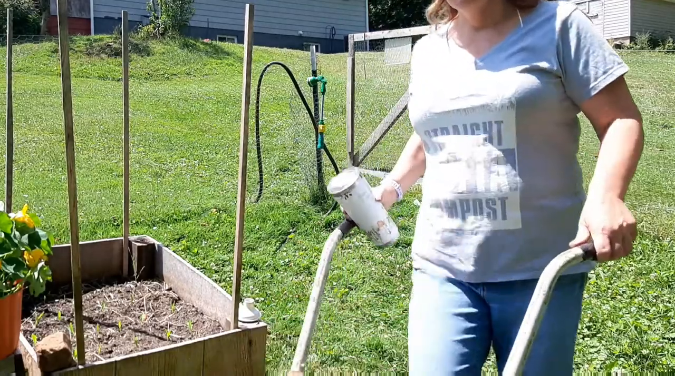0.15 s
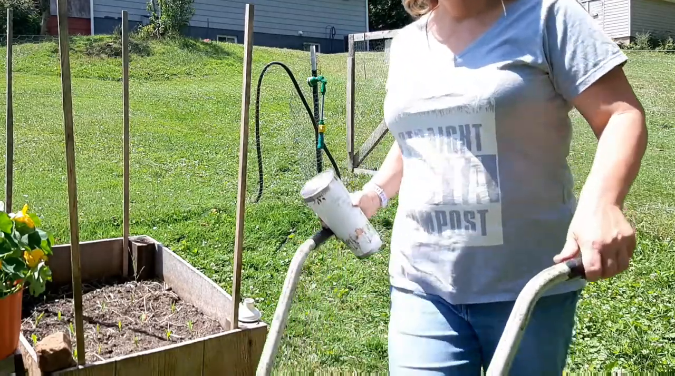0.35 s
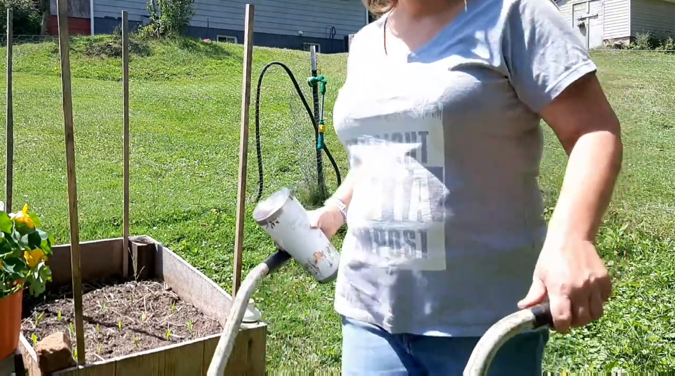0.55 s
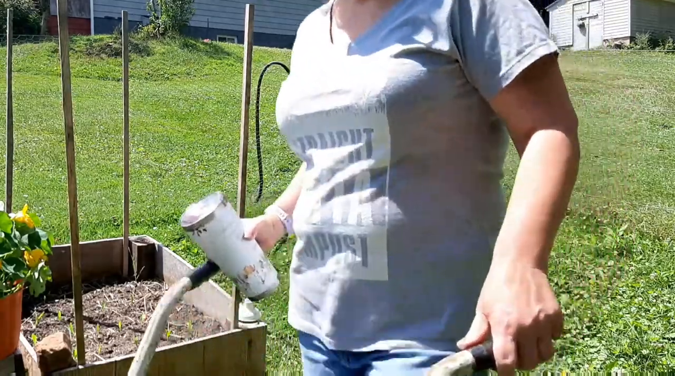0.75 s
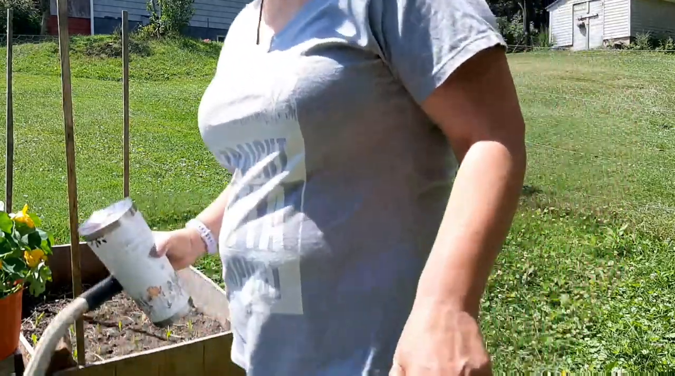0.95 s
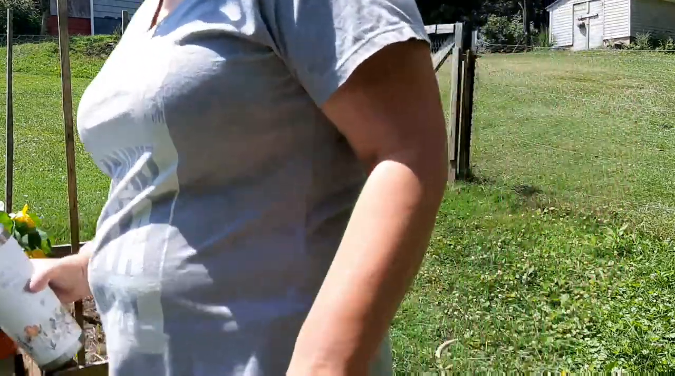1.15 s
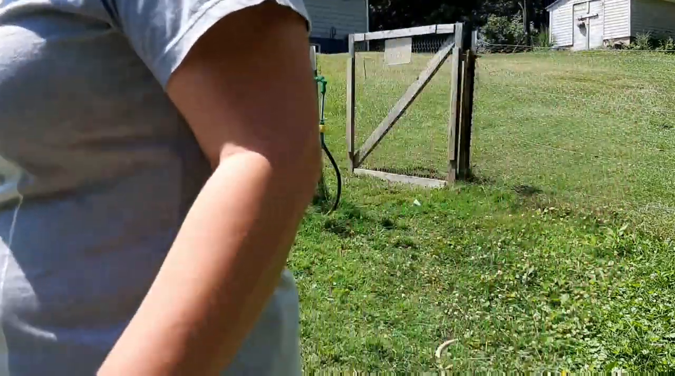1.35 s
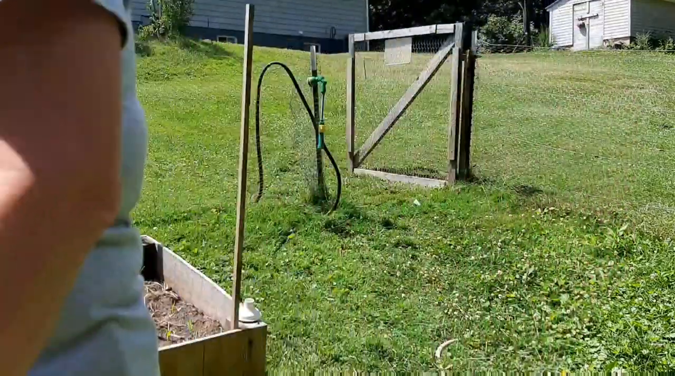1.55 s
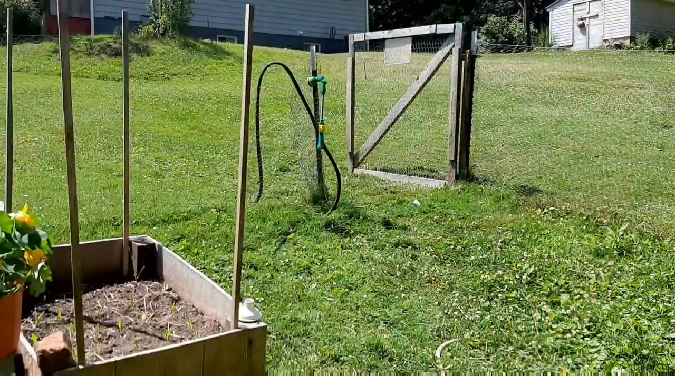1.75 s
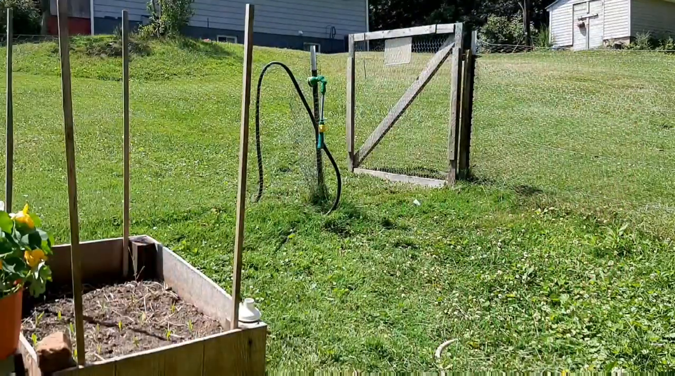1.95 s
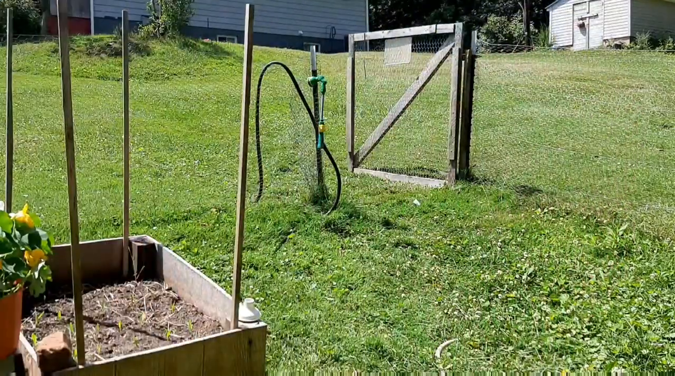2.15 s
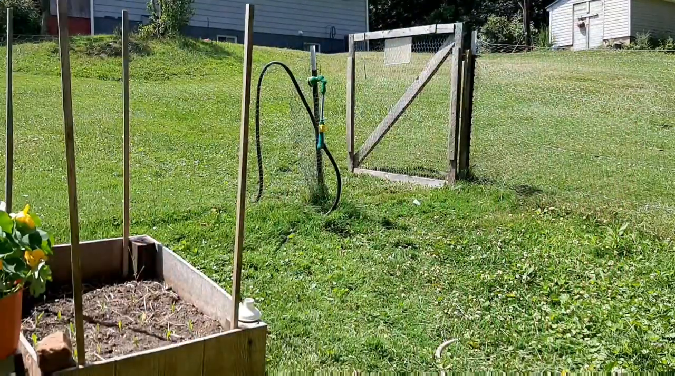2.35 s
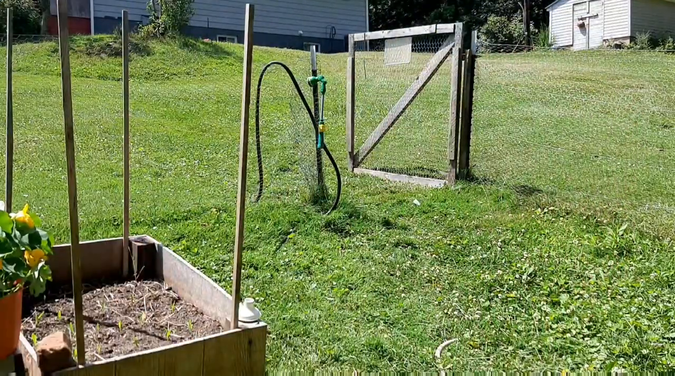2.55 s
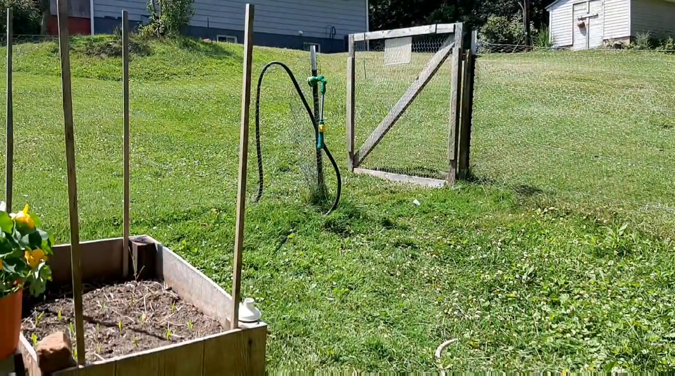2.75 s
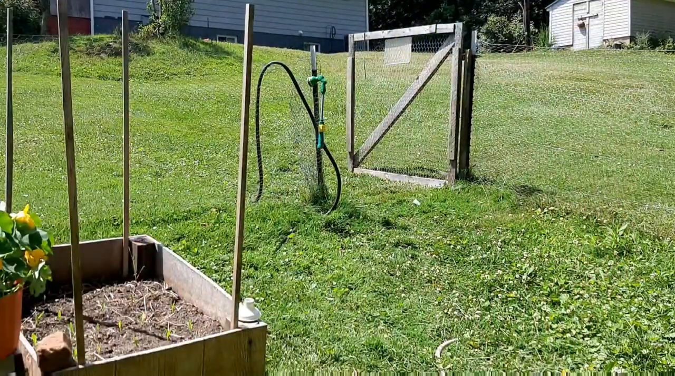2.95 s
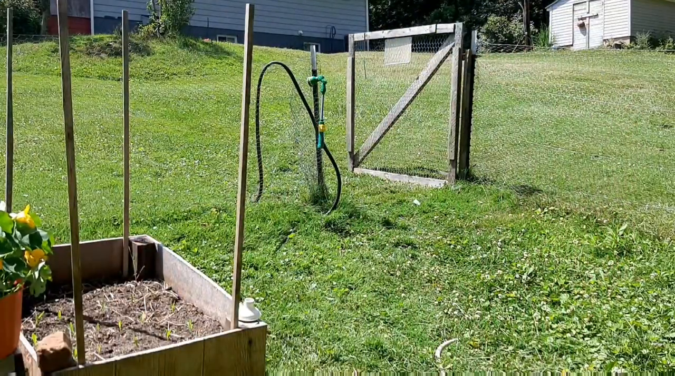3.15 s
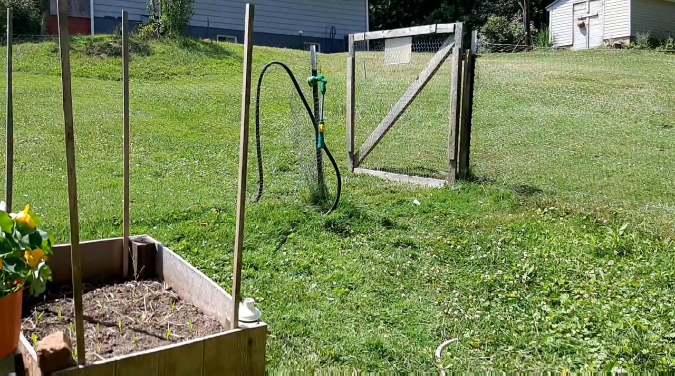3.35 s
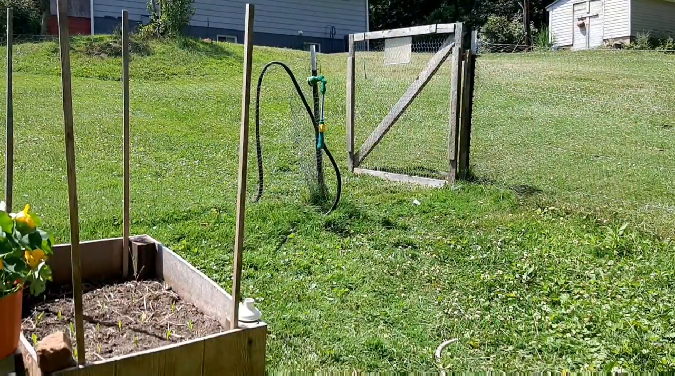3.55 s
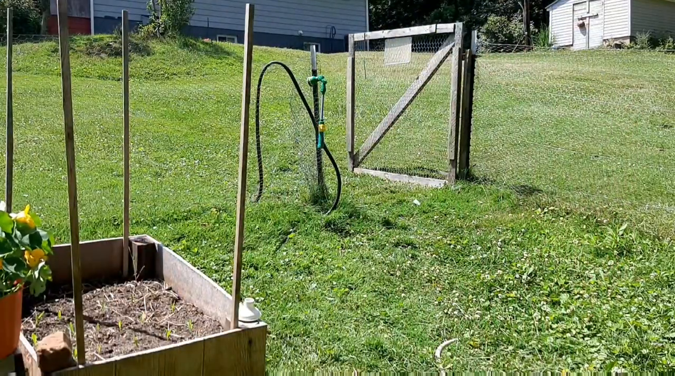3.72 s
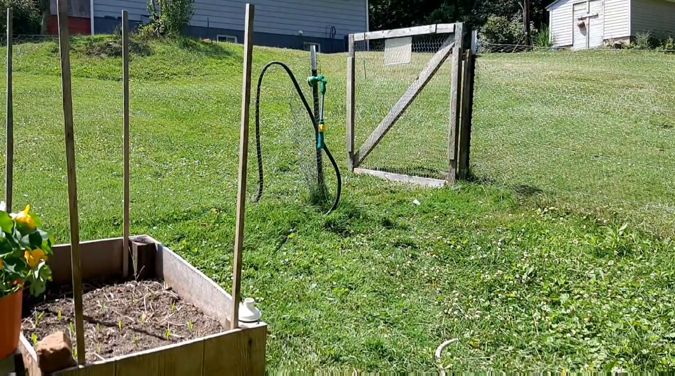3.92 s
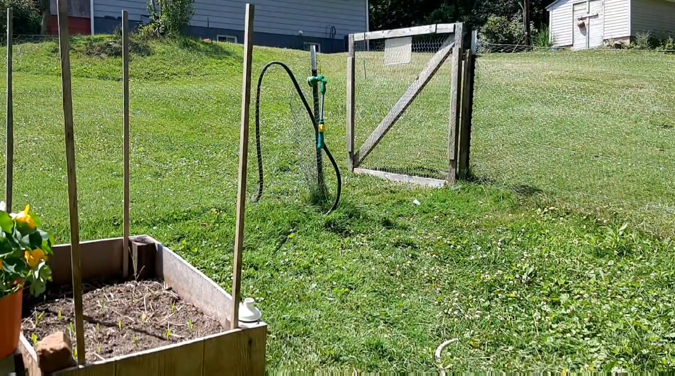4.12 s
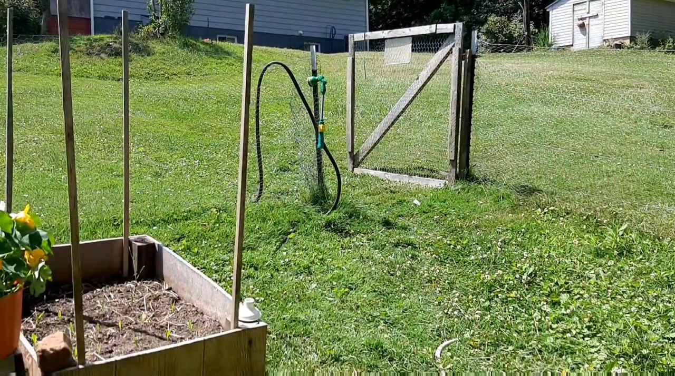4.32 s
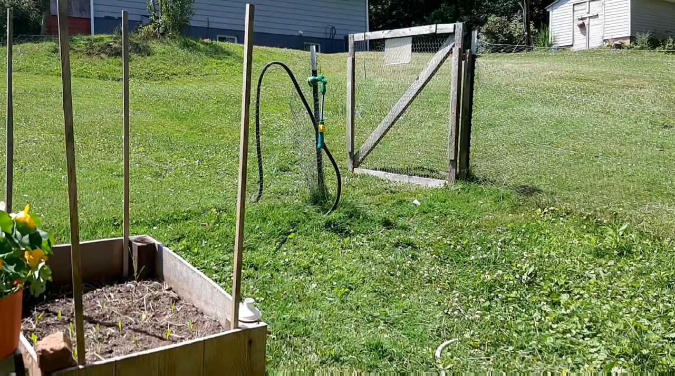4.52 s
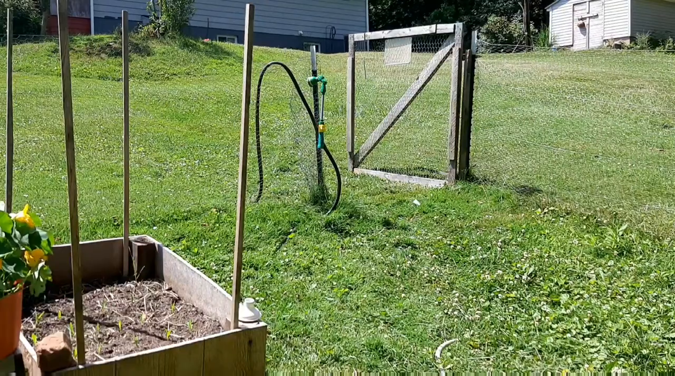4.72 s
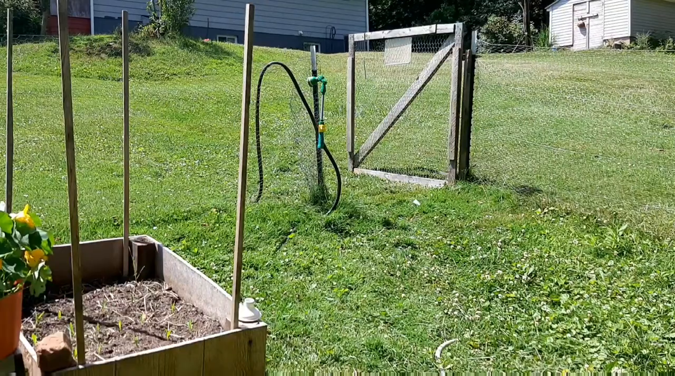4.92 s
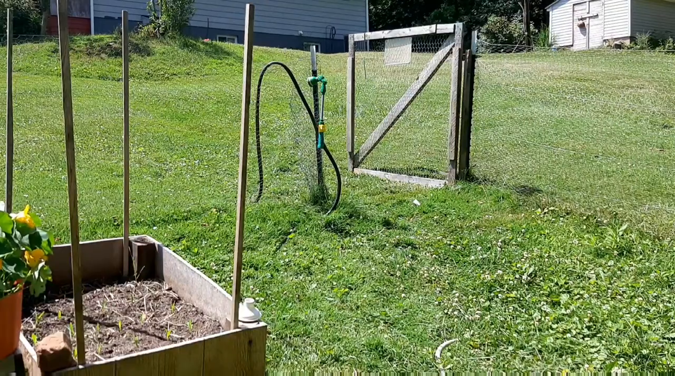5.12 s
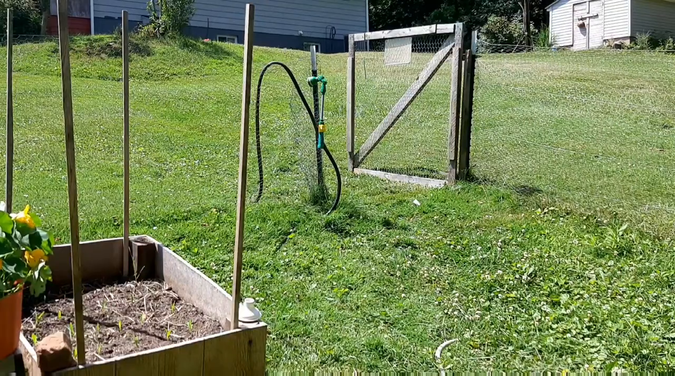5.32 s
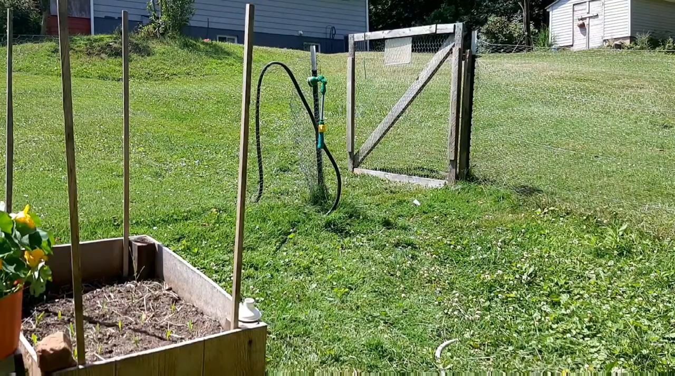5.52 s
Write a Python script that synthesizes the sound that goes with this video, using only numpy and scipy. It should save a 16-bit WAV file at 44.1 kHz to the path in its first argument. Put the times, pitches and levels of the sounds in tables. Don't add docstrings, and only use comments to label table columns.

```python
import sys
import numpy as np
from scipy import signal
from scipy.fft import rfft, irfft, next_fast_len
from scipy.io import wavfile
from scipy.ndimage import uniform_filter1d, map_coordinates

SR = 44100
rng = np.random.default_rng(int(sys.argv[2]) if len(sys.argv) > 2 else 0)


def wav_out(sig):
    wavfile.write(sys.argv[1], SR, np.round(np.clip(np.atleast_2d(sig).T, -1, 1) * 32767).astype(np.int16))


def attenuation_scalar(level_db):
    decades = np.asarray(level_db, float) / 20
    return 10 ** decades


N = 246078

# start_s, peak_db, chatter_s, clear_notes_db
PAIL_CONTACTS = [(0.1964, -24, 0.011, 1), (0.2168, -22, 0.017, 8), (0.2383, -18.5, 0.0038, 10),
                 (0.2507, -24.5, 0.0021, 15), (0.259, -29, 0.0011, 0), (0.2735, -35, 0.0024, 5),
                 (0.29, -43, 0.01, -5), (0.4484, -48.5, 0.0075, 19), (0.4636, -45.5, 0.0059, 15),
                 (0.51, -47, 0.0017, 5), (0.526, -47.5, 0.0033, 20), (0.5305, -43, 0.0028, 25),
                 (0.593, -53, 0.006, 5), (0.6322, -42.5, 0.0017, 1), (0.651, -32.5, 0.005, -1),
                 (0.6724, -44, 0.0044, 5), (0.693, -22, 0.0092, 5.5), (0.7155, -28, 0.0076, 9.5),
                 (0.749, -45, 0.011, 18), (0.849, -18.5, 0.002, 5), (0.8633, -33, 0.014, -4.5),
                 (1.2272, -39.5, 0.008, 12), (1.2432, -25, 0.014, 0), (1.269, -34, 0.012, 15),
                 (1.3241, -38, 0.013, 9), (1.335, -42.5, 0.014, 16), (1.416, -47, 0.0088, 26),
                 (1.4701, -24.5, 0.0044, 3.5), (1.4771, -25.5, 0.0056, 11), (1.489, -30, 0.019, 15),
                 (1.7894, -52, 0.025, -11), (2.029, -46, 0.0086, 20), (4.6167, -46, 0.014, 15),
                 (4.6509, -55.5, 0.036, 0), (0.002, -48.5, 0.011, 22), (0.046, -48, 0.014, 17),
                 (0.2262, -27.5, 0.0017, 5), (0.3, -44, 0.003, 10), (1.505, -38, 0.0029, 13)]
STRUCK_PART = [0, 0, 0, 8, 8, 8, 8, 7, 7, 7, 7, 7, 7, 7, 7, 7, 1, 1, 1, 2, 2, 2, 3, 3, 3, 9, 9, 4, 4, 4, 2,
               5, 6, 6, 10, 10, 0, 8, 4]
# pitch_hz, level_db, t60_s
PAIL_RINGS = [
    [(879, -10, 0.3), (1543, -16, 0.54), (3440, -12, 0.36), (4260, -16, 0.3), (4750, -10, 0.11),
     (5100, 0, 0.11), (5330, -22, 0.47), (5600, -18, 0.29), (5970, -9, 0.23), (6100, -10, 0.3),
     (6424, -8, 0.3), (6400, -12, 0.18), (6700, -19, 0.41), (7300, -27, 0.2), (8000, -15, 0.23)],
    [(897, -3, 0.37), (3036, -17, 1.5), (3200, -2, 0.25), (3370, 4, 0.31), (4100, -8, 0.2),
     (5319, -3, 0.18), (5814, -9, 0.29), (6000, -3, 0.16), (6616, 0, 0.22), (7700, -6, 0.33)],
    [(1800, -18, 0.32), (2035, -18, 0.12), (2290, 4, 0.19), (2490, 1, 0.24), (2600, -2, 0.22),
     (2750, -1, 0.16), (3010, -3, 0.2), (3236, 4, 0.22), (3420, -7, 0.25), (4020, -10, 0.24),
     (4872, -14, 0.25), (5297, -5, 0.22), (5930, -10, 0.12)],
    [(1710, -1, 0.43), (2030, -7, 0.26), (2330, -11, 0.25), (3085, -5.5, 0.54), (3424, -14, 0.45),
     (4172, -10, 0.4), (4500, -5, 0.22), (4770, -5, 0.34), (5360, -2, 0.24), (5550, -10, 0.16),
     (6105, -15, 0.25), (7187, -4.5, 0.16)],
    [(1705, -12, 0.49), (2180, -17, 0.28), (3474, -3.5, 0.32), (4260, -9, 0.29), (4540, 1.5, 0.13),
     (4940, -1, 0.088), (5400, -7, 0.14), (6340, -13, 0.22), (6520, -4, 0.15), (6870, -5, 0.23),
     (7321, -9, 0.2), (7477, -4, 0.15)],
]
# pitch_hz, level_db, t60_s
PAIL_MORE_RINGS = [
    [(1788, 1, 0.12), (2080, 0, .15)],
    [(2670, 6, .04), (3000, 1, .04), (3400, 2, .04)],
    [(4210, 3, .07), (5020, 3, .06), (5530, 2, .06), (6130, -8, .1), (7600, -8, 0.12)],
    [(890, -18, 0.4), (1533, -10, 0.47), (3380, -13, 0.44), (4200, -14, 0.38), (4670, -16, 0.13),
     (5360, -7, 0.16), (5760, -12, 0.2), (6158, -2, 0.2), (6370, -4, 0.24), (6700, -8, 0.16),
     (6940, -13, 0.18), (7397, -18, 0.18), (7950, -14, 0.29)],
    [(1677, -2, 0.43), (2276, 12, 0.37), (3180, -6, .4), (4770, -8, .3)],
    [(798, 4, .3), (1680, -8, .3), (2060, -6, 0.38), (2340, 4, 0.4), (2660, -1, .35), (4035, 2.5, .3)],
]
# frequency_hz, density_db_per_hz
SHEET_OVERTONES = [
    [(350, -55), (600, -9), (915, -18), (1300, -16), (2600, -25), (3400, -20), (5150, -9.5), (9630, -21),
     (15500, -25)],
    [(350, -29), (600, 3), (927, -2.5), (1230, -18), (1560, -6), (2500, -13), (3330, -2), (6850, -8),
     (15500, -18.5)],
    [(350, -1.5), (600, 1.5), (1300, -13), (1880, -10), (2040, 0.5), (2250, -2.5), (3160, -1.5), (3610, -7),
     (5590, -7.5), (8520, -22), (15500, -22)],
    [(350, -3), (600, 3), (1410, -24), (1730, -8), (2040, -12), (3770, -11.5), (7330, -8.5), (8520, -20.5),
     (15500, -28)],
    [(350, -47), (600, -10.5), (1200, -40), (1730, -19.5), (3820, -19.5), (4430, -11.5), (6850, -16.5),
     (15500, -24)],
    [(900, -49), (1600, -13), (1900, -8), (2400, -4), (5000, -4), (8000, -17), (15500, -30)],
    [(1200, -6.5), (2200, -12), (3000, -7), (3700, -13), (6000, -9), (8000, -22), (15500, -21)],
    [(600, -3), (1500, -6.5), (2800, -3.5), (4200, -6), (5500, -6), (7000, -19), (9000, -21), (15500, -28)],
    [(240, -35), (400, -7), (928, -4), (1200, -14), (1540, -5), (2590, -21), (6280, -5), (9790, -17),
     (15500, -24)],
    [(600, -9), (1700, -14), (2500, 5), (5000, 2), (8000, -21), (15500, -30)],
    [(400, -17), (800, 4), (1200, -12), (2600, 3), (4200, -11), (5500, -24), (15500, -40)],
]
# frequency_hz, t60_s
STEEL_DAMPING = [(600, 0.73), (2500, 0.44), (6000, 0.2), (12000, 0.11), (16000, 0.085)]
# start_s, peak_db, strongest_note_hz, t60_s, brightness_db
WHEEL_BUMPS = [(0.047, -21.5, 197, 0.078, -4), (0.216, -22, 151, 0.38, 3.5), (0.239, -31.5, 291.4, 0.56, 6),
               (0.414, -18, 205, 0.14, -33), (0.429, -23.5, 220.8, 0.36, -12),
               (0.634, -23.5, 305.6, 0.24, -3), (0.681, -20.5, 136, 0.067, 7.5),
               (0.693, -31, 304, 0.53, 11), (0.845, -25.5, 204, 0.28, 0), (1.217, -31, 300, 0.082, -5),
               (1.228, -20.5, 276, 0.096, 7), (1.249, -20.5, 161.4, 0.68, -5), (1.41, -32, 332, 0.13, -1),
               (1.469, -28, 153.5, 0.2, -11), (1.55, -22, 343, 0.096, -11), (1.787, -24.5, 321, 0.21, -19),
               (2.289, -32, 130, 0.2, -16), (4.63, -51, 149, 0.29, 0)]
# centre_hz, width_hz, level_db
TRAY_MODES = [(151.5, 72, -1.5), (210, 47, 0.5), (291.6, 48.5, 1), (348.5, 46.3, -0.5), (456.5, 20, -4),
              (589, 20, -9)]
# time_s, drumming_db
BARROW_PASS = [(0.0, -48.5), (0.31, -45.5), (0.9, -43.5), (1.2, -45.5), (1.39, -42.5), (1.57, -43),
               (1.7, -53.5), (1.82, -44), (2.0, -54), (2.3, -58.5), (2.5, -66)]
# middle_s, hum_db, half_length_s
TYRE_LOADS = [
    (.3, -45, 0.049),
    (.95, -43, 0.12),
    (1.3, -47.5, 0.32),
    (1.57, -65, 0.042),
    (1.8, -54, 0.068),
    (2.25, -45.5, 0.14),
]
# middle_s, level_db, half_length_s
FOOTFALLS = [(0.526, -63, 0.014), (0.784, -69, 0.046), (0.933, -65, 0.027), (1.005, -64, 0.025),
             (1.097, -70, 0.12), (1.317, -59, 0.012), (1.433, -65.5, 0.1), (1.68, -68.5, 0.18),
             (1.81, -69, 0.023), (1.964, -72, 0.073), (2.25, -74, 0.29), (2.712, -71.5, 0.41),
             (2.99, -72, 0.062), (3.442, -71.5, 0.046), (3.96, -70, 0.062), (4.36, -77, 0.21),
             (4.53, -75, 0.024), (4.876, -77, 0.088), (5.087, -69.5, 0.068), (5.284, -74, 0.082),
             (5.39, -69, 0.057), (5.477, -65, 0.057)]
# frequency_hz, density_db_per_hz
GRASS_COLOUR = [(1470, -46), (2500, -29), (3240, -52), (3980, -8), (7620, 0), (8680, -7.5), (10900, -5.5),
                (15500, -0.5)]
# middle_s, buffet_db, half_length_s
WIND_GUSTS = [(.1, -54.5, 0.26), (.95, -70, 0.22), (1.5, -68, 0.44), (.6, -79, 0.067), (2.15, -78, 0.62),
              (2.6, -67.5, 0.2), (3.08, -48.5, 0.052), (3.2, -44, 0.049), (3.32, -44, 0.082),
              (3.42, -51.5, 0.084), (3.62, -68, 0.14), (3.86, -68, 0.11), (5.17, -67, .06),
              (4.5, -68, 0.25), (4.95, -64.5, 0.26), (5.42, -59, 0.13)]
# frequency_hz, density_db_per_hz
BUFFET_COLOUR = [(12, -35), (38, 2.5), (72, 8.5), (163, -15.5), (195, -44), (360, -57), (498, -24),
                 (545, -35), (1010, -29.5), (1500, -42), (1950, -56), (3300, -120)]
# frequency_hz, density_db_per_hz
HUM_COLOUR = [(53, -47), (90, -2), (140, 1), (202, -9), (306, -3.5), (492, -8.5), (844, -11), (1020, -20),
              (1520, -16.5), (1870, -24.5), (2020, -17), (4000, -35), (5200, -34), (8800, -120)]
# time_s, leaves_db
LEAF_BREEZE = [(0, -60.5), (1.0, -61), (1.29, -69.5), (1.5, -61.5), (2.2, -62), (3.56, -64.5), (4.46, -64),
               (5.04, -68), (5.58, -61)]
# frequency_hz, density_db_per_hz
LEAF_COLOUR = [(1470, -2.5), (2500, -6), (3520, -8), (5010, -8), (7560, -15), (7920, -18.5), (8680, -29),
               (10900, -23), (15500, -23.5)]
# start_s, length_s, from_hz, to_hz, level_db
BIRD_SLURS = [
    (1.205, .03, 2600, 2540, -61),
    (2.842, .075, 3600, 2530, -57.5),
    (2.933, .034, 3300, 2290, -54.5),
    (3.955, .055, 2950, 2580, -57.5),
    (4.004, .028, 2700, 3380, -64),
    (4.885, .07, 2620, 2340, -61),
]
# start_s, length_s, from_hz, to_hz, level_db
BIRD_STROKES = [(3.39, .042, 2440, 2680, -56), (3.505, .045, 3135, 3120, -63),
                (3.554, .015, 2750, 3250, -52), (3.571, .011, 2500, 3200, -54),
                (3.586, .009, 2700, 3100, -57), (3.024, .024, 2280, 2340, -56),
                (2.918, .013, 2450, 2800, -62), (3.62, .01, 2250, 2650, -60),
                (4.082, .012, 2000, 2450, -55), (4.612, .026, 3900, 4900, -70),
                (3.533, .012, 2800, 3400, -64)]
# start_s, length_s, from_hz, to_hz, level_db
BIRD_HELD = [(.578, .04, 2430, 2500, -57), (.622, .03, 2480, 2450, -57), (.59, .05, 3150, 3200, -67),
             (4.955, .03, 2340, 2300, -64), (1.16, .035, 2040, 2040, -73), (1.575, .075, 2995, 3000, -64),
             (2.965, .036, 2270, 2310, -55), (3.085, .08, 2400, 2280, -62), (2.945, .05, 2640, 2580, -63),
             (2.9, .08, 2900, 2850, -67), (3.05, .07, 2800, 2620, -66), (4.094, .03, 2080, 2150, -63),
             (3.96, .1, 2020, 2020, -71), (3.434, .02, 2350, 2210, -55), (3.455, .012, 2200, 1950, -57),
             (3.468, .018, 2820, 2330, -52), (3.615, .075, 3120, 3120, -67), (4.034, .046, 3330, 2080, -54),
             (4.148, .09, 2590, 2570, -58.5), (4.447, .055, 4900, 4860, -66),
             (4.657, .018, 4170, 3800, -65)]
# start_s, length_s, from_hz, to_hz, level_db
BIRD_BURR = [(1.775, .065, 4250, 4350, -71), (1.8, .04, 4300, 3300, -70), (3.564, .038, 2460, 2440, -58.5),
             (3.605, .06, 2400, 2300, -63), (3.675, .05, 2250, 2330, -64), (3.745, .03, 2150, 2300, -66),
             (3.772, .016, 2320, 2120, -59), (4.624, .024, 3150, 2850, -59), (4.628, .018, 2750, 3300, -62),
             (4.655, .03, 2800, 3200, -65), (4.815, .07, 2760, 2600, -66), (4.235, .05, 2780, 2720, -61),
             (4.215, .095, 3050, 2930, -68), (4.245, .1, 2330, 2100, -64), (4.345, .06, 2280, 2150, -65),
             (4.41, .1, 2200, 2080, -69), (4.3, .09, 2720, 2650, -68)]
# frequency_hz, t60_s
TREE_ECHO = [(1500, 0.62), (3000, 0.63), (6000, 0.91)]
# time_s, level_db
MOTOR_LEVEL = [(0, -86), (3.5, -76.5), (3.9, -79), (4.6, -80), (5.1, -75), (5.35, -78), (5.58, -65)]
# frequency_hz, level_db
MIC_OPENING = [(6500, 1.5), (8000, 3), (8500, -2.5), (9800, 0), (10600, 5.5)]

FREE_S = 0.014
HARD_RING, FULL_RING = 0.6, 1
TYRE_DB = -7.5
CALM_DB = -67
HUM_DB, HUM_NEAR_DB = -65.5, -26
HUM_GUST_DB, HUM_LAG_S = -21, 0.21
LANDING = 2.4
GROW_DB, FADE_DB, BURR_FADE_DB = 8, 5, 3
PEEP_S, PEEP_EVERY_S, PEEP_LONG_S = 1.915, 0.128, 0.06
PEEP_HZ, PEEP_SAG_HZ, PEEP_DB, PEEP_LOSS_DB = 4190, 22, -65.5, 3.2
MOTOR_HZ = 1530


def unit(x):
    return x / np.sqrt(np.mean(x ** 2) + 1e-20)


def along(points, hz):
    f, v = np.transpose(points)
    return np.interp(np.log(hz + 1), np.log(f + 1), v)


def curve(rows):
    s, value = np.transpose(rows)
    return np.interp(np.arange(N) / SR, s, value)


def swells(rows):
    t = np.arange(N) / SR
    return sum(attenuation_scalar(db) * np.exp(-((t - s) / max(half, 0.002)) ** 2) for s, db, half in rows)


def wobble(rate):
    knots = rng.standard_normal(int(N * rate / SR) + 4)
    return map_coordinates(knots, [np.arange(N) * rate / SR])


def filtered(x, response):
    m = next_fast_len(len(x) + 8192)
    return irfft(rfft(x, m) * response(np.fft.rfftfreq(m, 1 / SR)), m)[:len(x)]


def rush(spectrum, patchy_db):
    z = signal.stft(rng.standard_normal(N), nperseg=512)[2]
    field = uniform_filter1d(rng.standard_normal(z.shape), size=6, axis=0)
    field = uniform_filter1d(field, size=10, axis=1)
    patchy = signal.istft(z * attenuation_scalar(patchy_db * unit(field)), nperseg=512)[1][:N]
    return unit(filtered(patchy, lambda hz: attenuation_scalar(along(spectrum, hz))))


def dying(t60s, spectrum, stretch=1, size=SR):
    hz, t, z = signal.stft(rng.standard_normal(size), SR, nperseg=128)
    level_db = along(spectrum, hz)[:, None] - 60 * t / stretch / along(t60s, hz)[:, None]
    tail = signal.istft(z * attenuation_scalar(level_db), SR, nperseg=128)[1][:size]
    return tail / np.linalg.norm(tail)


def add(track, s, sound):
    at = round(s * SR)
    track[at:at + len(sound)] += sound


def pail_notes(part, knocks, ring, t):
    hz, level_db, t60 = np.transpose((PAIL_RINGS + PAIL_MORE_RINGS)[part])[..., None]
    detune = np.reshape([0, 0.004, 0.007, 0.01], (4, 1, 1))
    twins = hz * (1 + detune * rng.standard_normal((4, len(hz), 1)))
    scatter_db = 1.2 * rng.standard_normal(hz.shape)
    t60 = np.clip(t60, 0.03, 1.45 * along(STEEL_DAMPING, hz))
    fade = attenuation_scalar(level_db + scatter_db - 60 * t / (ring * t60))
    struck = abs(rfft(knocks, SR))[twins.astype(int)] / np.linalg.norm(knocks)
    share = np.reshape([1, 0.6, 0.45, 0.35], (4, 1, 1)) / np.maximum(struck, 0.35)
    beating = (np.sin(2 * np.pi * twins * t) * share).sum(0)
    notes = (fade * beating).sum(0)
    return notes / np.linalg.norm(notes)


def pail():
    out, t = np.zeros(N + 2 * SR), np.arange(SR // 3) / SR
    for (s, db, chatter, notes_db), part in zip(PAIL_CONTACTS, STRUCK_PART):
        hard = np.clip((db + 52) / 18, 0, 1)
        u = t[:SR // 10] / max(chatter, 0.0005)
        knocks = rng.laplace(size=len(u)) * (hard + (1 - hard) * u) * np.exp(-u)
        knocks[0] = 0.36 * hard * np.linalg.norm(knocks)
        ring = np.clip(chatter / FREE_S + HARD_RING * hard, 0.2, FULL_RING)
        notes = attenuation_scalar(notes_db - 6 - 15 * (1 - hard)) * pail_notes(part, knocks, ring, t)
        overtones = dying(STEEL_DAMPING, SHEET_OVERTONES[part], ring, size=len(t))
        clank = signal.fftconvolve(knocks, overtones + notes)
        attack_rms = np.sqrt(np.mean(clank[:SR // 30] ** 2))
        add(out, s, attenuation_scalar(db - 15.5) * clank / attack_rms)
    return out[:N]


def tray_response(f):
    total = 0
    for k, (centre, width, db) in enumerate(TRAY_MODES):
        damped = 1j * f * width
        total = total + (-1) ** k * attenuation_scalar(db) * damped / (centre * centre - f * f + damped)
    return total / (1 + (f / 800) ** 4)


def bumps():
    out, t = np.zeros(N + 2 * SR), np.arange(SR) / SR
    u = t / 0.00058
    push = u ** 2 * np.exp(1 - u) * (1 - u / 3)
    for s, db, hz, t60, bright_db in WHEEL_BUMPS:
        fade = attenuation_scalar(-60 * t / np.clip(t60, 0.03, 0.6)) * (1 - np.exp(-t / 0.005))
        note = fade * np.sin(2 * np.pi * hz * t)
        shake = fade * unit(filtered(rng.standard_normal(SR), tray_response))
        add(out, s, attenuation_scalar(db - 13) * (note + attenuation_scalar(bright_db) * (shake + 1.2 * push)))
    return out[:N]


def rolling():
    drum_db = curve(BARROW_PASS)
    turf = attenuation_scalar(1.5 * wobble(14)) * rng.standard_normal(N)
    drum = attenuation_scalar(drum_db - 3.5) * unit(filtered(turf, tray_response))
    tyre_hz = 80 + 3.66 * wobble(9.8)
    tyre = np.sqrt(2) * np.sin(2 * np.pi * np.cumsum(tyre_hz) / SR)
    load = attenuation_scalar(drum_db + TYRE_DB) + swells(TYRE_LOADS)
    gone = np.clip((2.75 - np.arange(N) / SR) / 0.24, 0, 1)
    return gone * (drum + attenuation_scalar(-11.5) * load * tyre)


def footfalls():
    rustle = attenuation_scalar(2.2 * wobble(40) + 0.72 * wobble(250)) * rush(GRASS_COLOUR, patchy_db=-2)
    return swells(FOOTFALLS) * unit(rustle)


def gust_strength():
    return attenuation_scalar(CALM_DB) + swells(WIND_GUSTS)


def buffeting():
    eddies = rush(BUFFET_COLOUR, patchy_db=2)
    even = abs(uniform_filter1d(eddies ** 2, size=SR // 12)) ** 0.4 + 0.1
    return gust_strength() * unit(attenuation_scalar(2 * wobble(9.6)) * eddies / even)


def birds():
    direct = calls()
    tail = rfft(dying(TREE_ECHO, [(1000, 0), (8000, 0)]) * attenuation_scalar(0.59 * wobble(28)[:SR]))
    tail = irfft(tail / np.sqrt(uniform_filter1d(abs(tail) ** 2, size=70)))
    flutter_hz = 210 + 130 * wobble(80)
    smeared = direct * (0.9 + 0.75 * np.cos(2 * np.pi * np.cumsum(flutter_hz) / SR))
    late = np.pad(smeared, (700, 0))
    echo = signal.fftconvolve(late, tail / np.linalg.norm(tail))[:N]
    return attenuation_scalar(-2.5) * direct + attenuation_scalar(-4.2) * echo


def calls():
    peeps = []
    for k in range(5):
        hz = PEEP_HZ - k * PEEP_SAG_HZ
        start_s, db = PEEP_S + k * PEEP_EVERY_S, PEEP_DB - k * PEEP_LOSS_DB
        peeps.append((start_s, PEEP_LONG_S, hz, hz - PEEP_SAG_HZ, db))
    song = whistles(BIRD_SLURS, LANDING, -GROW_DB, 0, flutter_db=2.2, warble=0.009)
    song += whistles(BIRD_STROKES, 1, -GROW_DB, 0, flutter_db=1.2, warble=0.005)
    song += whistles(BIRD_HELD, 1, 0, -FADE_DB, flutter_db=1.2, warble=0.005)
    burr = whistles(BIRD_BURR, 1.31, 0, -BURR_FADE_DB, flutter_db=0, warble=0.011)
    return song + burr + whistles(peeps, 1, 0, 0, flutter_db=6.5, warble=0.0075)


def whistles(notes, landing, start_db, end_db, flutter_db, warble):
    out, waver = np.zeros(N), 1 + warble * wobble(140)
    for s, length, from_hz, to_hz, db in notes:
        u = np.arange(0, 1, 1 / (length * SR))
        ends = np.clip(np.minimum(u, 1 - u) * length / 0.0033, 0, 1)
        glide = (1 - u) ** landing
        pitch = (to_hz + (from_hz - to_hz) * glide) * waver[round(s * SR):][:len(u)]
        level_db = db + 2.5 + start_db * glide + end_db * u
        add(out, s, ends * attenuation_scalar(level_db) * np.sin(2 * np.pi * np.cumsum(pitch) / SR))
    return out * attenuation_scalar(flutter_db * wobble(70))


def leaves():
    return attenuation_scalar(curve(LEAF_BREEZE) - 3) * rush(LEAF_COLOUR, patchy_db=1.5)


def far_hum():
    near = attenuation_scalar(curve(BARROW_PASS) + HUM_NEAR_DB)
    gust = attenuation_scalar(HUM_GUST_DB) * np.roll(gust_strength(), round(HUM_LAG_S * SR))
    return attenuation_scalar(3) * (attenuation_scalar(HUM_DB) + near + gust) * rush(HUM_COLOUR, patchy_db=1.7)


def whine():
    tone = np.sin(2 * np.pi * np.cumsum(MOTOR_HZ + 14 * wobble(30)) / SR)
    return attenuation_scalar(curve(MOTOR_LEVEL) + 2.9 * wobble(25)) * tone


def scene():
    barrow = pail() + bumps() + rolling() + footfalls()
    garden = buffeting() + birds() + leaves() + far_hum() + whine()
    return (barrow + garden)[None]


def band_limit(x):
    return signal.sosfilt(signal.butter(12, 16470, fs=SR, output="sos"), x)


def record(dry):
    def microphone(hz):
        return attenuation_scalar(along(MIC_OPENING, hz)) * (hz < 15810) / (1 + (32 / (hz + 1)) ** 4)
    heard = filtered(dry[0], microphone)
    return band_limit(heard[None])


dry = scene()
out = record(dry)
wav_out(out)
```